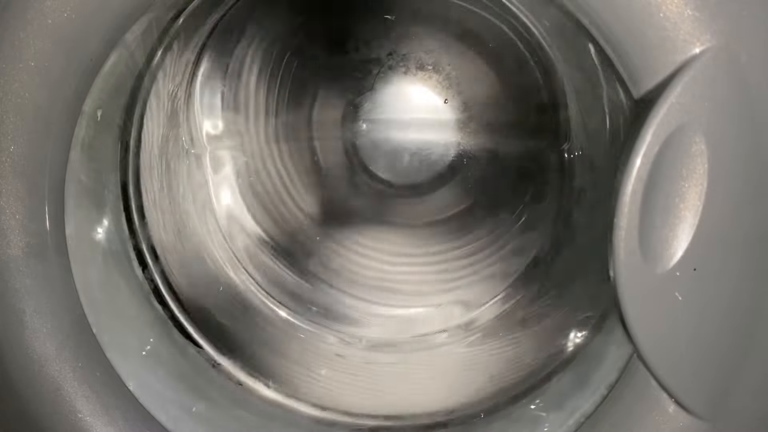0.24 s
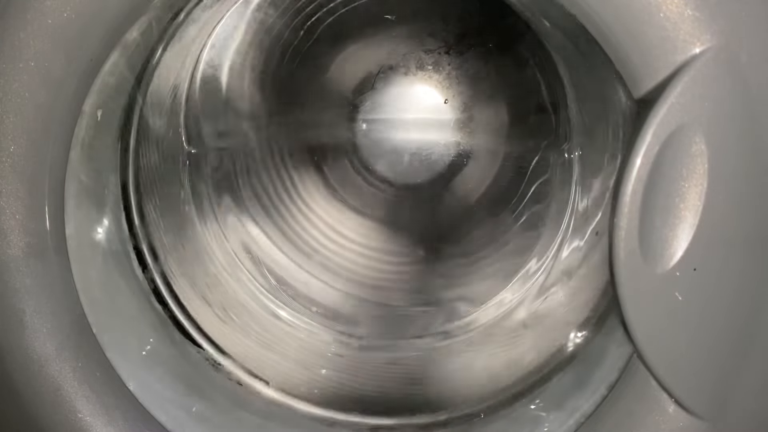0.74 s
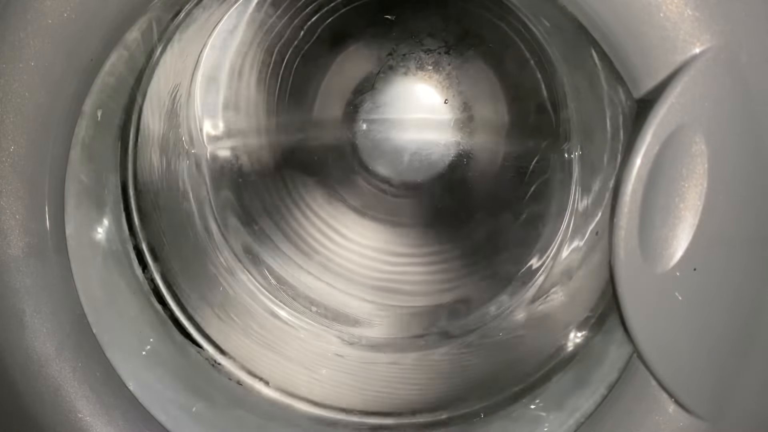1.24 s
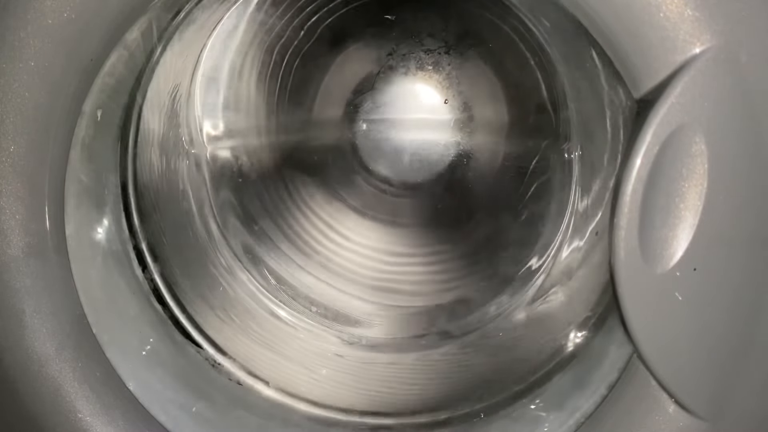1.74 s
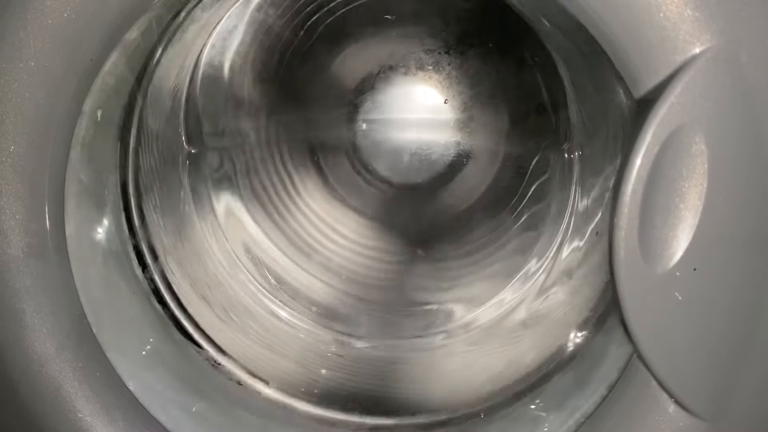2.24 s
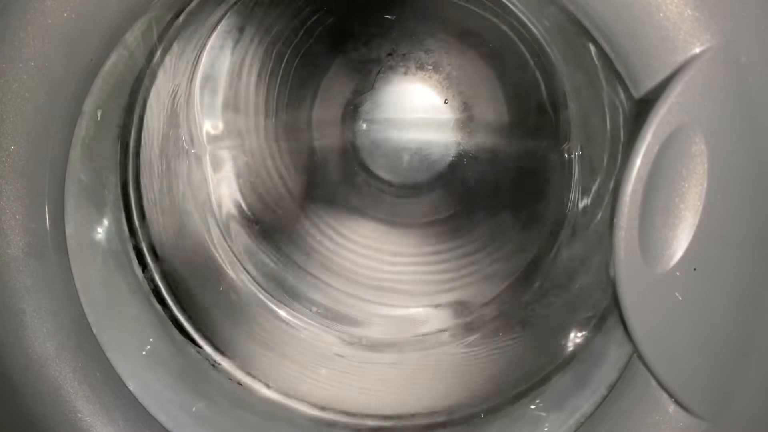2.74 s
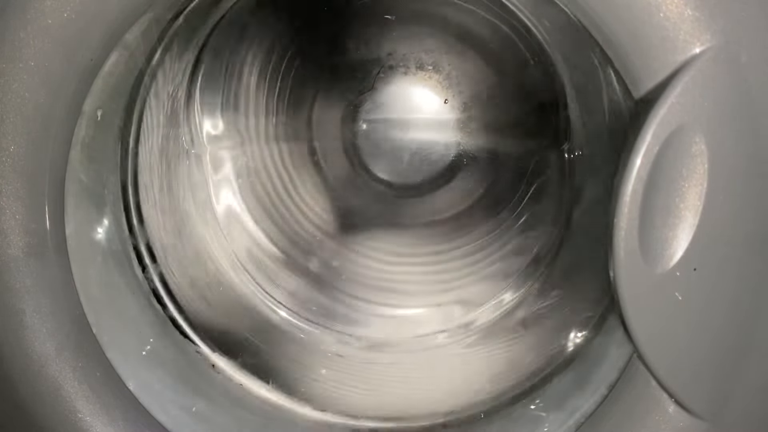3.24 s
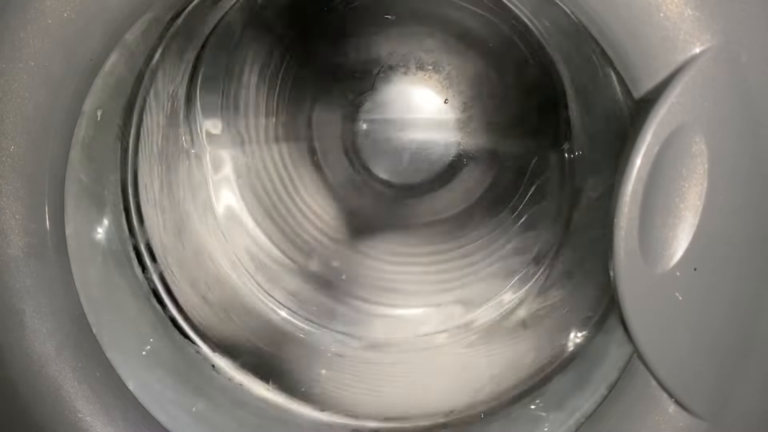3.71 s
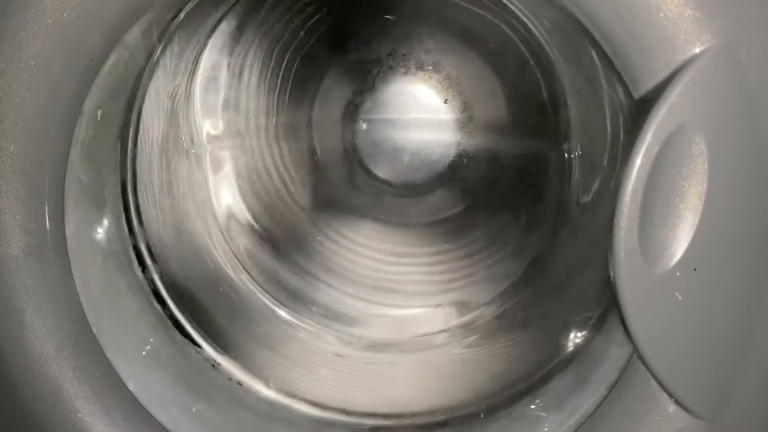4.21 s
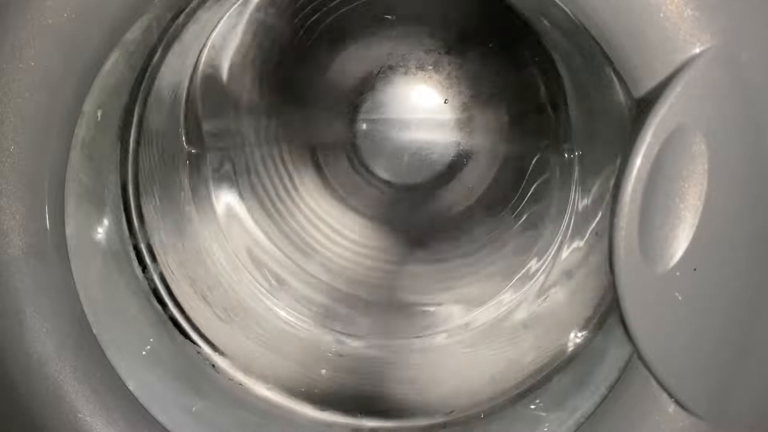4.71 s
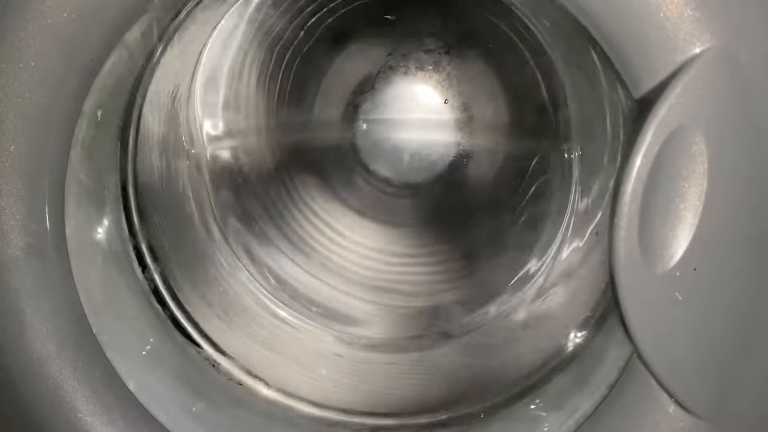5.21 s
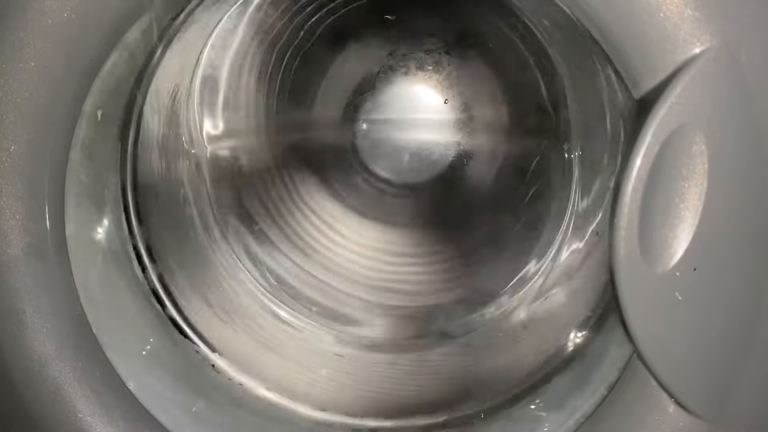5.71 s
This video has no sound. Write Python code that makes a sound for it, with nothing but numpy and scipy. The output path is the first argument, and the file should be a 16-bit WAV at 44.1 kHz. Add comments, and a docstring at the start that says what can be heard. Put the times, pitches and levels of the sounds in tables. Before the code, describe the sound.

A front-loading washing machine spins fast and gradually gains speed, heard close to its door in a quiet room. A low, throbbing motor hum and a higher whining tone slowly rise together over a steady rush of drum and air. Faint, thin squeals and low drones come and go throughout. Near the end the higher tone swells, and the cabinet rocks once with a soft, low thud.

```python
"""A front-loading washing machine speeds up its spin, heard close to the door in a quiet room.
Its motor, belt, drum and bearings make tones at fixed multiples of the motor shaft's speed, so
they all rise together. They swell as they climb through the cabinet's resonances (the pitches
at which it likes to ring). Brief low hums and high squeals come and go. Behind them are the rush
of drum and air, the hum of the mains power and one soft thud as the cabinet rocks."""
import sys
import numpy as np
from scipy import signal
from scipy.fft import rfft, irfft, next_fast_len
from scipy.io import wavfile

SR = 44100
rng = np.random.default_rng(int(sys.argv[2]) if len(sys.argv) > 2 else 0)


def store_pcm(level_fs):
    """Save levels as 16-bit WAV."""
    pcm = np.round(np.clip(level_fs, -1, 1) * 32767).astype(np.int16)
    wavfile.write(sys.argv[1], SR, np.atleast_2d(pcm).T)


N = 262395
FFT_SIZE = next_fast_len(N)
HZ = np.maximum(np.arange(FFT_SIZE // 2 + 1) * SR / FFT_SIZE, 1)   # pitch of each spectrum slot


# How fast the motor shaft spins: time_s, turns_per_s
SHAFT_SPEED = [(0.0, 115.0), (0.99, 118.99), (1.98, 122.75), (2.98, 127.1), (3.97, 130.45), (4.96, 135.05),
               (5.95, 138.56)]

def motor_shaft():
    """The shaft speeds up: gives its speed and the turns it has made so far."""
    speed = over_time(SHAFT_SPEED)
    return speed, np.cumsum(speed) / SR


# The off-balance motor's tone, a throbbing tone one drum-turn rate above it, and the bearing
# track's tone, each with its resonances: shaft_multiple, [(pitch_hz, width_hz, peak_db)]
LOUD_TONES = [(1, [(124.6, 10, -36), (130.1, 5.9, -34), (135.7, 5, -41)]), (1.1487, [(137.2, 14.3, -30),
              (147, 7.1, -40)]), (5.151, [(640.5, 17, -42.5), (681.3, 12.3, -39.5), (698.2, 17, -28.5)])]

def loud_tones(speed, turns):
    """The three loudest tones each swell as their pitch passes a resonance."""
    out = 0
    for multiple, peaks in LOUD_TONES:
        gain = sum(from_db(db) * resonance(multiple * speed, hz, width) for hz, width, db in peaks)
        out += gain * tone(multiple * turns, 0)
    return out


# Levels in these five tables are before the cabinet shapes them.
# The wobbling drum: drum_multiple, level_db
DRUM_WOBBLE = [(4, 16), (5, 7), (8, 14), (9, 16.5), (10, 14.5), (12, 18), (14, 14), (15, 14), (16, 15.5),
               (18, 20.5), (20, 13.5), (21, 16), (22, 6.5), (24, 11), (26, 18.5), (27, 13.5), (28, -12),
               (32, 10), (42, 15), (45, 11.5)]
# The cage that holds the bearing's balls: cage_multiple, level_db
BEARING_CAGE = [(2, -1), (4, 18), (5, 16), (6, 14)]
# The belt and pulley: shaft_multiple, level_db
BELT_TONES = [(2.65, 14), (2.71, 15), (2.76, 15), (3.03, 9), (4.35, 12), (4.55, 12), (6.9, 3), (7.15, 5),
              (7.59, 5), (8.01, 4)]
# The motor's slots and contact bars: shaft_multiple, level_db
MOTOR_WHINE = [(18, 10), (23, 12), (26, 12), (36, 13), (38, 11), (60, 12), (68, 14), (71, 13), (72, 13),
               (73, 14), (75, 13), (78, 13), (83, 13), (96, 12), (108, 12)]
# Balls rolling along the bearing's tracks: shaft_multiple, level_db
BALL_WHINE = [(18.76, 13), (20.14, 14), (20.54, 10), (22.22, 13), (23.92, 13), (30.84, 13), (33.84, 14),
              (34.56, 13), (37.26, 15), (40.7, 14), (41.3, 12), (43.8, 13), (44.1, 14), (47.52, 13),
              (48.24, 11), (50.94, 17), (54.06, 13), (54.4, 15), (55.06, 13), (57.76, 14), (64.56, 13),
              (65.36, 13)]
DRUM_RATIO, CAGE_RATIO = .1489, .3829   # turns per shaft turn

def spinning_parts(turns):
    """Each turning part repeats its motion, making tones that rise with the shaft's speed."""
    low_tones = [(multiple * DRUM_RATIO, db) for multiple, db in DRUM_WOBBLE]
    low_tones += [(multiple * CAGE_RATIO, db) for multiple, db in BEARING_CAGE] + BELT_TONES
    drone = sum(tone(multiple * turns, db) for multiple, db in low_tones)
    whine = sum(tone(multiple * turns, db - 4, waver_db=3) for multiple, db in MOTOR_WHINE + BALL_WHINE)
    buzz = uneven_turning(DRUM_RATIO * turns, db=4.5, first=29, count=70)
    buzz += uneven_turning(turns, db=9.5, first=7, count=104)
    return cabinet(drone + whine + buzz + faint_squeals(turns), cabinet_ring=0.88, motor_ring=0.98)


def uneven_turning(turns, db, first, count, size=4096):
    """An uneven part repeats one random shape every turn: a buzz of `count` multiples of its speed."""
    strengths = rng.uniform(0.27, 1.61, count)
    spectrum = np.zeros((2, size // 2 + 1), complex)
    spectrum[:, first:first + count] = strengths * np.exp(2j * np.pi * rng.random((2, count)))
    shapes = irfft(spectrum) * size / np.sqrt(2) * from_db(db)
    return np.array([np.interp(turns % 1, np.arange(size) / size, shape, period=1) for shape in shapes])


# Brief swells of the spinning tones, from low drum hums to high squeals:
# middle_s, shaft_multiple, level_db, length_s
BRIEF_SWELLS = [(0.09, 8.4, -39, 0.22), (0.1, 59.96, -55, 0.25), (0.13, 54.33, -53, 0.3),
                (0.21, 41.42, -57, 0.46), (0.27, 41.21, -53, 0.18), (0.28, 40.67, -52, 0.2),
                (0.32, 23.94, -54, 0.33), (0.35, 33.46, -59, 0.28), (0.35, 61.54, -57, 0.22),
                (0.5, 18.04, -57, 0.71), (0.63, 54.98, -56, 0.17), (0.7, 8.02, -38, 0.78),
                (0.95, 7.69, -40, 0.19), (1.04, 54.35, -57, 0.32), (1.07, 61.19, -57, 0.39),
                (1.09, 54.08, -53, 0.27), (1.1, 57.77, -56, 0.34), (1.14, 47.5, -57, 0.22),
                (1.17, 56.5, -57, 0.39), (1.25, 8.0, -42, 0.3), (1.25, 71.96, -58, 0.24),
                (1.26, 50.92, -58, 0.26), (1.32, 20.88, -51, 0.64), (1.34, 23.94, -51, 0.56),
                (1.4, 7.62, -41, 0.4), (1.41, 73.02, -58, 0.16), (1.5, 6.25, -44, 0.5),
                (1.55, 0.6, -41, 0.3), (1.5, 53.94, -57, 0.63), (1.56, 72.83, -58, 0.21),
                (1.57, 34.48, -54, 0.24), (1.7, 41.27, -57, 0.19), (1.71, 48.06, -60, 0.26),
                (1.73, 20.52, -53, 0.31), (1.74, 40.52, -51, 0.34), (1.8, 51.46, -57, 0.19),
                (1.92, 71.9, -53, 0.16), (1.96, 7.96, -38, 0.21), (1.97, 22.04, -54, 0.67),
                (1.85, 13.7, -48, 0.4), (2.3, 13.45, -48, 0.4), (2.0, 73.06, -58, 0.16),
                (2.05, 51.0, -55, 0.16), (2.1, 34.98, -53, 0.3), (2.22, 75.15, -61, 0.35),
                (2.31, 20.19, -53, 0.28), (2.34, 24.0, -55, 0.21), (2.34, 37.33, -56, 0.4),
                (2.35, 8.03, -39, 0.4), (2.42, 72.12, -55, 0.2), (2.42, 73.15, -59, 0.2),
                (2.5, 36.95, -56, 0.4), (2.56, 20.5, -54, 0.35), (2.5, 7.62, -39, 0.6),
                (2.9, 6.22, -44, 1.2), (2.68, 22.21, -51, 0.39), (2.75, 33.79, -55, 0.34),
                (2.77, 64.54, -59, 0.3), (2.82, 57.71, -58, 0.34), (2.83, 50.85, -54, 0.37),
                (2.88, 34.52, -53, 0.22), (2.89, 71.92, -57, 0.16), (2.97, 20.12, -48, 0.3),
                (3.05, 68.0, -60, 0.18), (3.06, 20.88, -53, 0.34), (3.16, 73.04, -57, 0.32),
                (3.22, 18.0, -55, 0.34), (3.25, 47.54, -54, 0.12), (3.3, 8.0, -41, 0.3),
                (3.32, 50.98, -57, 0.62), (3.35, 55.1, -57, 0.31), (3.37, 36.44, -57, 0.69),
                (3.38, 71.04, -57, 0.31), (3.6, 33.81, -52, 0.29), (3.67, 71.96, -49, 0.19),
                (3.69, 36.02, -55, 0.61), (3.8, 16.71, -50, 0.61), (3.94, 26.0, -56, 0.29),
                (4.13, 71.08, -57, 0.19), (4.21, 84.92, -60, 0.26), (4.22, 51.0, -58, 0.24),
                (4.25, 85.29, -60, 0.17), (4.29, 72.12, -57, 0.19), (4.3, 47.6, -49, 0.44),
                (4.31, 64.75, -56, 0.24), (4.33, 68.54, -57, 0.24), (4.34, 68.19, -58, 0.21),
                (4.37, 30.48, -57, 0.44), (4.39, 36.08, -55, 0.57), (4.4, 2.085, -38, 0.8),
                (4.4, 20.56, -49, 0.6), (4.42, 48.31, -49, 0.26), (4.47, 37.31, -56, 0.41),
                (4.5, 12.55, -48, 0.4), (4.56, 47.15, -55, 0.19), (4.57, 50.96, -55, 0.17),
                (4.6, 41.42, -59, 0.19), (4.67, 72.0, -56, 0.41), (4.73, 54.33, -52, 0.25),
                (4.95, 47.3, -53, 0.25), (4.98, 17.98, -57, 0.72), (5.14, 20.5, -49, 0.23),
                (5.15, 46.29, -58, 0.21), (5.2, 34.52, -56, 0.18), (5.22, 47.44, -45, 0.26),
                (5.27, 12.25, -44, 0.4), (5.3, 72.04, -56, 0.16), (5.4, 6.71, -39, 0.75),
                (5.45, 68.17, -58, 0.18), (5.46, 18.75, -50, 0.2), (5.58, 33.9, -57, 0.31),
                (5.59, 15.79, -49, 0.2), (5.6, 47.35, -54, 0.3), (5.75, 12.1, -47, 0.4),
                (5.81, 47.48, -55, 0.33), (5.81, 50.9, -54, 0.33), (5.86, 30.73, -52, 0.3),
                (5.9, 44.02, -50, 0.3)]
# A swell's direct path, then its weaker roundabout path: gain_db
SWELL_PATHS = [
    [.5],
    [-3.5],
]

def swells(turns, rows=BRIEF_SWELLS):
    """Each brief tone swells, flutters and fades while its pitch follows the shaft."""
    time_s, out = np.arange(N) / SR, np.zeros((2, N))
    flutter = np.tile(from_db(1.5 * drift(rate_hz=12)), 2)
    for (middle_s, multiple, db, length_s), (phase, side, shift) in zip(rows, rng.random((len(rows), 3))):
        span = np.arange(*np.searchsorted(time_s, [middle_s - 2 * length_s, middle_s + 2 * length_s]))
        swell = from_db(db) * np.exp(-3 * ((time_s[span] - middle_s) / length_s) ** 2)
        swell *= flutter[span + int(shift * N)]
        if multiple < 10:   # low ones also pulse once per drum turn
            swell *= 1 + .5 * np.cos(2 * np.pi * (DRUM_RATIO * turns[span] + shift))
        phases = phase + np.array([[0], [np.sign(side - .5) / 4]])
        out[:, span] += np.sqrt(2) * swell * np.sin(2 * np.pi * (multiple * turns[span] + phases))
    return from_db(SWELL_PATHS) * out


def faint_squeals(turns, per_s=17, lowest=12, highest=75, length_s=0.28):
    """Fainter squeals come at random moments, shaft multiples and strengths."""
    chances = rng.random((round(per_s * N / SR), 3))
    rows = [(when * N / SR, lowest + pitch * (highest - lowest), 12.5 + 8 * strength, length_s)
            for when, pitch, strength in chances]
    return swells(turns, rows)


# Bands of air hiss that each gust on their own: low_hz, high_hz
GUST_BANDS = [(5500, 8000), (8000, 11000), (11000, 16000)]

def rush(speed, low_db_per_octave=8.5, high_db_per_octave=7):
    """Drum, laundry and cooling air make a noise that grows as the spin gets faster."""
    octaves = np.log2(speed / speed.mean())   # one octave is twice the speed
    noise = rng.standard_normal((2, N)) * np.sqrt(SR / 2)
    low = signal.sosfilt(signal.butter(1, 700, fs=SR, output="sos"), noise)
    high = noise - low
    for band in GUST_BANDS:
        hiss = signal.sosfilt(signal.butter(2, band, "band", fs=SR, output="sos"), noise)
        high += (from_db(1.7 * drift(rate_hz=9.8)) - 1) * hiss
    mixed = from_db(low_db_per_octave * octaves) * low + from_db(high_db_per_octave * octaves) * high
    return cabinet(mixed, cabinet_ring=0.63, motor_ring=0.56)


# Tones of the mains power: pitch_hz, level_db
HUM_TONES = [(50.15, -43), (100.3, -30), (150.4, -39.5), (451.3, -34.5)]
# Small rises and dips of the whole hum: time_s, gain_db
HUM_GAIN = [(0, -0.5), (2.0, -1.5), (2.25, 1), (2.9, 0.5), (3.68, -1.5), (3.8, 1), (4.3, -0.8), (5.95, -.8)]

def mains_hum():
    """The motor's coils and the pump buzz at multiples of the mains pitch, wavering together."""
    time_s = np.arange(N) / SR
    buzz = sum(tone(hz * time_s, db) for hz, db in HUM_TONES)
    return from_db(over_time(HUM_GAIN) + 1.43 * drift(rate_hz=0.94)) * buzz


# The cabinet rocking on its feet: middle_s, level_db
ROCKING = [(5.29, -27)]

def thud(pitch_hz=54, fade_s=0.028):
    """The cabinet rocks once: a few soft, low swings that swell and die away."""
    out = 0
    for middle_s, db in ROCKING:
        time_s = np.arange(N) / SR - middle_s
        out += from_db(db) * np.exp(-(time_s / fade_s) ** 2) * np.sin(2 * np.pi * pitch_hz * time_s)
    return out


# The machine's broad tone colour, then its highest treble: pitch_hz, gain_db
BODY_COLOUR = [(35, -81), (55, -61.5), (110, -60.5), (200, -72.5), (300, -62), (600, -60), (1050, -62.5),
               (1500, -69), (3000, -76.5), (3600, -80.5), (4500, -82), (5700, -85.5), (6500, -83.5)]
TREBLE_COLOUR = [(7700, -86), (9200, -84), (10000, -86.5), (12000, -89), (16000, -88.5)]
# Resonances (+) and dead spots (-) of cabinet, motor case and brush gear: pitch_hz, width_hz, gain_db
CABINET_PEAKS = [(74.4, 5.7, -11.5), (107.7, 3.2, 21), (138, 43, 12.5), (180.4, 5.6, 8.5),
                 (269, 37.7, 12.5), (319.8, 4.9, -23), (378, 27, 6), (423.9, 16.4, 20.5), (455, 9.9, -13),
                 (489, 16, -8), (495, 10.7, 9), (530.3, 22.7, 10.5), (548, 8.6, 7), (576, 32, -14.5),
                 (573, 12, 6), (687, 30, 4), (716, 13, -16), (770, 25, -0.5), (795, 30, 9.5), (800, 28, -5),
                 (913.5, 19, 7.5), (929, 42, 7.5), (993, 33, 10.5), (1202, 47, 6.5)]
MOTOR_PEAKS = [(1330, 40, 4), (1460, 30, -5), (1670, 30, 12), (1760, 40, 5), (1980, 60, -3), (2170, 60, 7),
               (2470, 50, -9), (2560, 35, 7), (2780, 50, 7), (2950, 50, -5), (3050, 90, 4), (3270, 150, 5),
               (4370, 80, 9), (4470, 40, -4), (4670, 80, 9), (4930, 60, 6), (5130, 80, 7), (5270, 60, 7),
               (6080, 30, 8), (6275, 70, 8), (6455, 90, 10), (6915, 60, 8), (7165, 30, 7), (7290, 70, 11)]
BRUSH_PEAKS = [(7890, 90, 6), (8810, 50, 7), (8990, 120, 6), (9310, 90, 12), (10550, 120, 8),
               (11190, 150, 7), (14700, 90, 6)]

def cabinet(sound, cabinet_ring, motor_ring):
    """Cabinet and motor boost some pitches and swallow others; each `ring` scales their gain_db."""
    gain_db = over_pitch(BODY_COLOUR + TREBLE_COLOUR)
    for ring, peaks in (cabinet_ring, CABINET_PEAKS), (motor_ring, MOTOR_PEAKS + BRUSH_PEAKS):
        gain_db += ring * sum(db * resonance(HZ, hz, width) for hz, width, db in peaks)
    return irfft(rfft(sound, FFT_SIZE) * from_db(gain_db), FFT_SIZE)[..., :N]


def room(paths, echo_db=-8, fade_s=.12, above_hz=2000):
    """Nearby walls and the floor add a short tail of echoes to the treble."""
    time_s = np.arange(round(fade_s * SR)) / SR
    tail = rng.standard_normal(len(time_s)) * from_db(-60 * time_s / fade_s)
    tail /= np.sqrt(np.sum(tail ** 2))
    echoes = rfft(tail, FFT_SIZE) * from_db(echo_db) / (1 + (above_hz / HZ) ** 4)
    return irfft(rfft(paths, FFT_SIZE) * (1 + echoes), FFT_SIZE)[:, :N]


# How alike left and right sound: pitch_hz, likeness_0_to_1
SIDE_LIKENESS = [(60, 1), (140, 0.97), (210, 0.83), (500, 0.73), (770, 0.14), (1200, 0), (1800, 0.12),
                 (2700, 0.58), (5500, 0.48), (6800, 1), (16000, 1)]
# How much louder the left is than the right: pitch_hz, balance_db
SIDE_BALANCE = [(60, -3), (87, -1), (130, 0), (180, -0.5), (260, -2.5), (380, 5.5), (550, -1), (790, 3),
                (1140, 2), (1650, 0.5), (2380, 1.5), (3440, 3), (4970, 3.5), (7180, 1), (10400, 2.5),
                (15000, -1.5)]

def left_and_right(paths, lag_s=.000238, lag_above_hz=6950):
    """Both sides share the direct sound and get the roundabout sound opposed; left treble comes late."""
    direct, roundabout = rfft(paths, FFT_SIZE)
    alike = np.clip(over_pitch(SIDE_LIKENESS), 0, 1)
    shared = np.sqrt((1 + alike) / 2) * direct
    opposed = np.sqrt((1 - alike) / 2) * roundabout
    lag = np.exp(-1j * np.pi * lag_s * np.maximum(HZ - lag_above_hz, 0))
    tilt = from_db(over_pitch(SIDE_BALANCE) / 2) * lag
    return irfft([(shared + opposed) * tilt, (shared - opposed) / tilt], FFT_SIZE)[:, :N]


def tone(cycles, db, waver_db=.6):
    """A wavering tone on two paths: direct, and roundabout (a quarter cycle early or late)."""
    phases = rng.random() + np.array([[0], [rng.choice([-1, 1]) / 4]])
    gain = from_db(db + waver_db * drift(rate_hz=2.9))
    return np.sqrt(2) * gain * np.sin(2 * np.pi * (cycles + phases))


def resonance(pitch_hz, peak_hz, width_hz):
    """A hump that is 1 at the peak and falls away on both sides."""
    return 1 / (1 + (2 * (pitch_hz - peak_hz) / width_hz) ** 2)


def drift(rate_hz):
    """A slow random wander with a typical size of 1."""
    memory = np.exp(-200 * np.pi * rate_hz / SR)
    steps = rng.standard_normal(N // 100 + 1002)   # one per 100 samples, plus a run-up
    slow = signal.lfilter([1], [1, -2 * memory, memory ** 2], steps)[1000:]
    return np.interp(np.arange(N) / 100, np.arange(len(slow)), slow / np.sqrt(np.mean(slow ** 2)))


def from_db(db):
    """Turn decibels into a number to multiply by."""
    return 10 ** (np.asarray(db) / 20)


def over_time(points):
    """Join a table's points into one value per sample."""
    return np.interp(np.arange(N) / SR, *np.transpose(points))


def over_pitch(points):
    """Join a table's points into one value per pitch in HZ."""
    hz, value = np.transpose(points)
    return np.interp(np.log(HZ), np.log(hz), value)


def scene():
    """The machine fills the room; the brief swells come straight through the door."""
    speed, turns = motor_shaft()
    brief_swells = swells(turns)
    machine = spinning_parts(turns) + loud_tones(speed, turns) + rush(speed) + mains_hum() + thud()
    return left_and_right(room(machine) + brief_swells)


def record(dry):
    """Cut away the very highest treble, above 15740 Hz."""
    return signal.sosfilt(signal.ellip(14, .5, 70, 15740, fs=SR, output="sos"), dry)


dry = scene()
out = record(dry)
store_pcm(out)
```